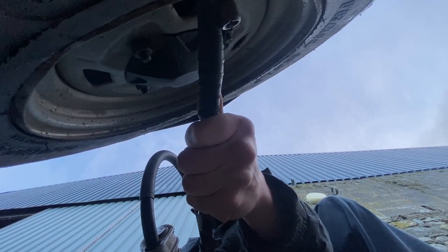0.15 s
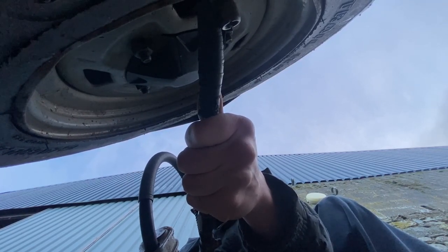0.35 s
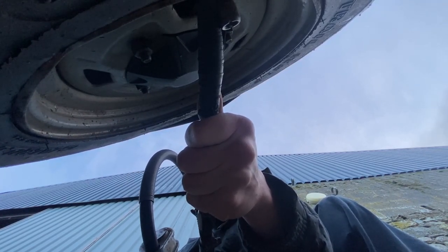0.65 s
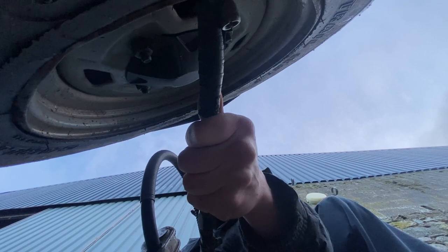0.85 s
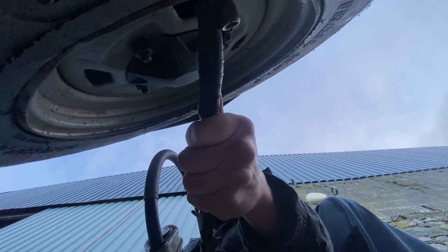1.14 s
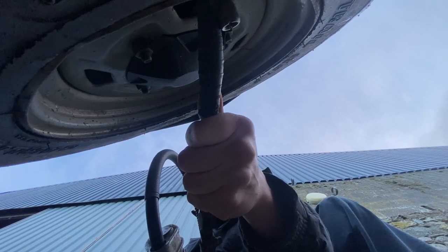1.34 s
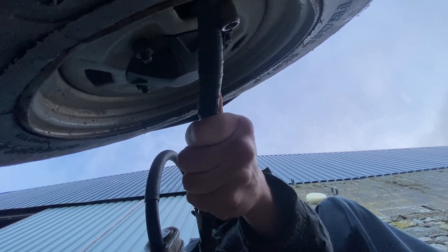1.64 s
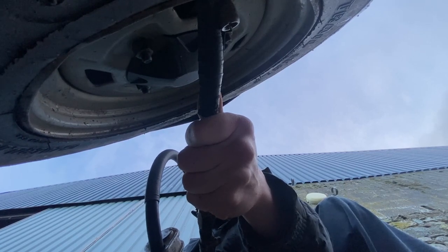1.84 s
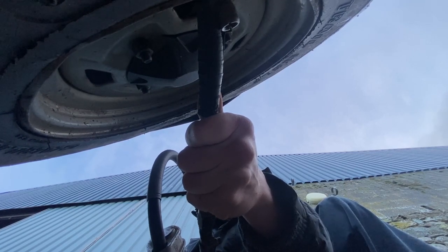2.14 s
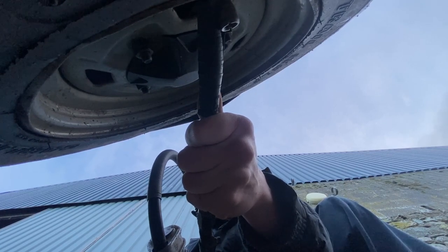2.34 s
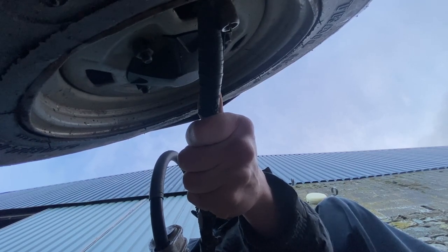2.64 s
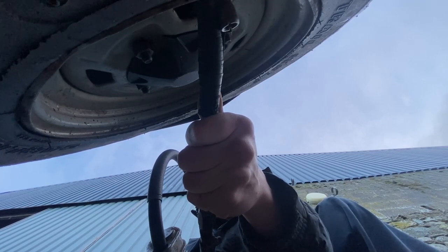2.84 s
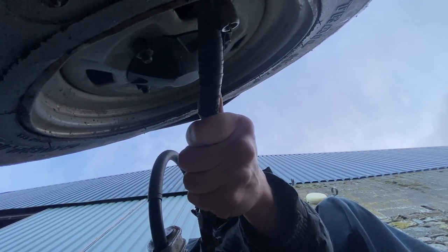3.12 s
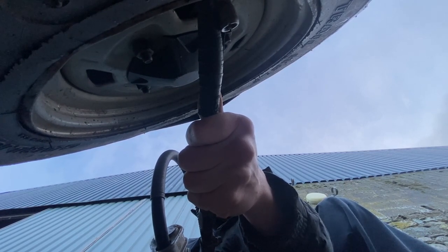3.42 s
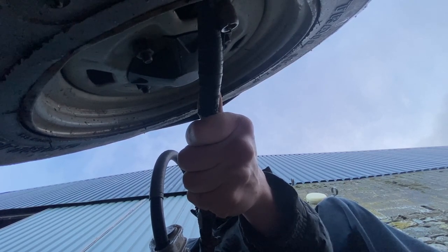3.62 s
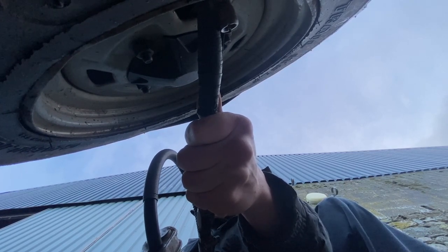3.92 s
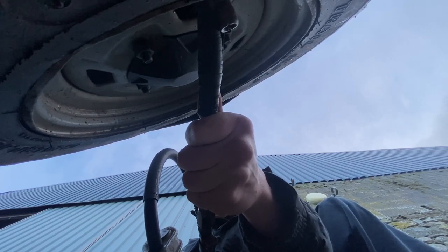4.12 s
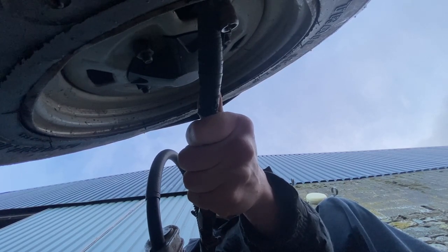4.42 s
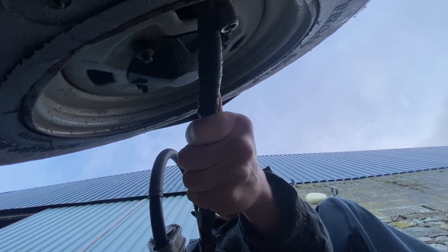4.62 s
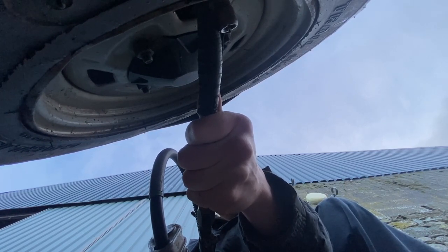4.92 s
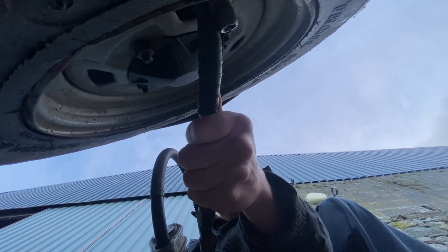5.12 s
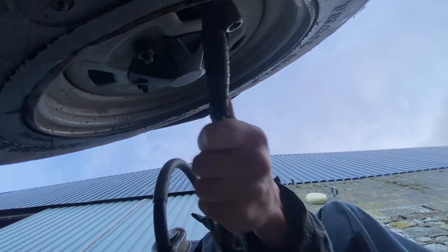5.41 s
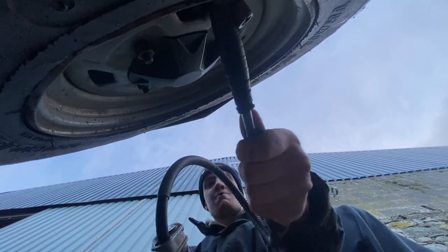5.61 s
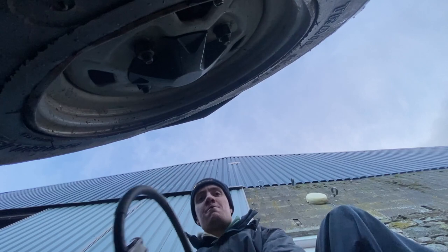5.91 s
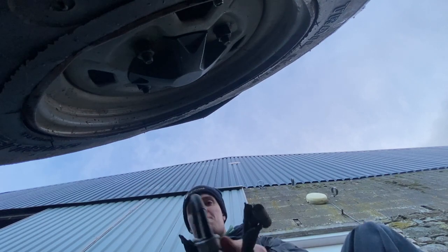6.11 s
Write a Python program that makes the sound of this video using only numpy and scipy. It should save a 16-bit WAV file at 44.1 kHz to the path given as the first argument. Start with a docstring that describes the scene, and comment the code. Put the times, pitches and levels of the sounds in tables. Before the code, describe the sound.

Outdoors, close under a wheel, a hand-held inflator fills a tyre in five short goes of hollow, slightly ringing hiss. Every trigger press and release vents a much louder spurt of air, most ending in a low pop, with small clicks around them. Air seeps faintly in the pauses. Near the end the nozzle comes off the valve with one last blast. Wind buffets the microphone over a faint yard hum.

```python
"""Under a wheel, outdoors: a hand-held inflator fills the tyre in five short goes.
Valve turbulence hisses through the air modes of hose and tyre. Each trigger press or release vents a
blast that ends in a low pop; trigger and chuck tick. Air seeps between goes, and the chuck comes off
with a last blast. Wind buffets the microphones over a faint yard hum."""
import sys
import numpy as np
from scipy import signal
from scipy.fft import rfft, irfft, next_fast_len
from scipy.io import wavfile
from scipy.ndimage import uniform_filter1d, map_coordinates

SR = 44100
rng = np.random.default_rng(int(sys.argv[2]) if len(sys.argv) > 2 else 0)


def materialize(psi):
    """Save the field psi as 16-bit PCM at rate SR to the path in sys.argv[1].

    A 1-D psi becomes a single channel; in a 2-D psi each row is a channel.
    """
    bounded = np.clip(np.atleast_2d(psi).T, -1, 1)
    quanta = np.round(bounded * 32767).astype(np.int16)
    wavfile.write(sys.argv[1], SR, quanta)


N = 276066

# Noise spectra (frequency [Hz], density [dB])
FILL_SPECTRUM = [(290, -50), (500, -16), (900, -18), (1130, -14), (1790, -21.5), (2200, -12), (3500, -16),
                 (4500, -12.5), (4800, -7.5), (6400, -9), (7700, -14.5), (10600, -18.5), (12300, -22.5),
                 (12800, -62)]
YARD_SPECTRUM = [(150, -19), (250, -9), (538, -12.5), (824, -15.5), (895, -12), (983, -18), (2170, -17.5),
                 (2750, -19), (4200, -22), (5460, -58.5), (9240, -120)]
RUMBLE_SPECTRUM = [(15, -29.5), (25, -16), (47, 2), (70, 5.5), (86, 3.5), (160, -13.5), (210, -40),
                   (350, -120)]
FLUTTER_SPECTRUM = [(65, -25.5), (110, -4), (188, -6), (348, -14), (438, -24), (504, -25.5), (900, -40),
                    (1170, -74), (1980, -120)]
JET_SPECTRUM = [(60, -39.5), (130, -15), (400, -12), (930, -15), (2100, -6), (2700, -10.5), (3290, -2.5),
                (3950, -14.5), (4910, 1.5), (5550, -4), (6100, 1.5), (7690, -11.5), (9700, -9.5),
                (16000, -26.5)]
SEEP_SPECTRUM = [(2100, -13.5), (3100, -3.5), (3800, -12), (4700, -1.5), (5110, -2), (6500, -6.5),
                 (7400, -14), (9460, -17), (11200, -21), (12300, -23), (12800, -59.5)]
LEAK_SPECTRUM = [(300, -21.5), (900, -30.5), (2200, -16), (2750, -25), (3300, -11.5), (4000, -21),
                 (4950, -4.5), (5550, -11.5), (6100, -5.5), (7700, -18.5), (9600, -11), (12300, -23),
                 (12900, -43), (14900, -43), (15300, -28)]
# Air modes of hose and tyre (frequency [Hz], relative strength [dB])
AIR_MODES = [(979, 4), (1141, 11), (1259, 4), (1356, 5), (1539, 5), (1701, 8), (1873, 10), (2002, 9),
             (2088, 8), (2196, 5), (2379, 10), (2573, 9), (2648, 5), (2950, 8), (3240, 11), (3445, 4),
             (3660, 7), (3908, 6), (4177, 10), (4349, 8), (4834, 5), (5060, 6), (5264, 8), (5426, 8),
             (5673, 8), (5878, 7), (5964, 6), (6110, 5), (6309, 8), (6729, 5)]
# Airflow, one per go (gain [dB])
GO_GAINS_DB = [-34, -34, -34, -34.5, -34]
# Gusts (start [s], hold [s], rumble [dB], flutter re rumble [dB])
WIND_GUSTS = [(.005, .035, -49, -10), (.1, .06, -44, -14), (.21, .07, -52, -12), (.57, .07, -55, -3),
              (.69, .03, -45, -8), (.745, .02, -45, -6), (.9, .05, -55, -6), (1.44, .05, -48, -5),
              (1.7, .07, -47, -10), (1.84, .07, -46, -8), (2.34, .035, -31, -16), (2.405, .03, -37, -16),
              (2.47, .11, -38, -15), (2.76, .09, -44, -14), (2.95, .09, -42, -14), (3.075, .085, -31, -14),
              (3.18, .02, -44, -4), (3.24, .1, -23, -10), (3.37, .05, -32, -8), (3.45, .09, -33, -14),
              (3.56, .05, -28, -6), (3.84, .08, -45, -11), (3.955, .09, -48, -4), (4.09, .07, -54, -3),
              (4.33, .04, -45, -4), (4.8, .1, -49, -8), (4.93, .1, -43, -8), (5.08, .12, -54, -8),
              (5.4, .17, -48, -4), (5.63, .06, -41, -12), (5.71, .13, -28, -3), (5.89, .04, -42, -6),
              (5.95, .045, -31, -14), (6.07, .08, -33, -10), (6.16, .055, -28, -7), (6.235, .05, -21, -3)]
# Trigger and chuck contacts (time [s], knock [dB], snap re knock [dB])
CONTACTS = [(0.011, -24.5, -26), (0.064, -36, 2), (0.09, -29.5, -8), (0.297, -16, -6.5), (0.447, -32, -6),
            (3.405, -33, -2), (3.512, -26, -8), (3.521, -27.5, -13.5), (3.539, -33.5, -3),
            (3.726, -30.5, -25.5), (3.975, -45, -1), (4.258, -29, -9.5), (5.563, -35, -10),
            (5.864, -45, -12), (5.884, -37, -21)]
# Trigger releases (time [s], rise [s], blast [dB], fall [dB/s], shuts after [s], pop [dB])
TRIGGER_RELEASES = [(0.316, .014, -11, 325, .089, -45), (1.576, .014, -12, 345, .16, -45),
                    (2.606, .014, -11.5, 300, .071, -23), (3.656, .008, -11.5, 380, .042, -19),
                    (5.338, .006, -11, 1200, .024, -13.5)]
# Trigger presses (valve seats [s], pop [dB], blast lead [s], blast [dB],
# bleed lead on blast [s], bleed [dB])
TRIGGER_PRESSES = [(0.6678, -17, .021, -13.5, .037, -28.5), (2.0226, -15, .021, -13.5, .03, -45),
                   (2.896, -19.5, .027, -14, .048, -27), (4.314, -16.5, .02, -17, .036, -38)]
# Chuck pulled off (time [s], pop [dB], bleed [dB], blast delay [s], blast [dB], fall [dB/s], length [s])
CHUCK_PULL = (5.699, -20, -27, .009, -12, 450, .038)
# Small second pop (time [s], level [dB])
SECOND_POP = (5.41, -30.5)
# Seeping air; last row a brief faint rustle (start [s], end [s], initial level [dB], settled level [dB])
FAINT_HISSES = [(.415, .61, -48, -53), (2.69, 2.82, -43, -56), (3.71, 4.24, -41, -58),
                (5.375, 5.695, -40, -47), (5.76, 6.26, -49, -58), (6.04, 6.07, -55, -57)]
# Trigger leak and chuck whistle envelopes (time [s], level [dB])
LEAK_LEVELS = [(1.66, -34), (2.0, -34)]
WHISTLE_LEVELS = [(3.72, -62), (4.25, -63)]
# Left-right likeness of air noise (frequency [Hz], coherence [0-1])
AIR_COHERENCE = [(150, .9), (800, 0.18), (2000, 0.47), (3500, 0.37), (4800, 0.9), (6500, 0.47),
                 (7200, 0.16), (9000, 0.43), (10000, 1), (12000, 0.4), (14000, 0.3)]
# Balance (frequency [Hz], left minus right [dB])
FILL_BALANCE = [(60, -6), (110, -0.5), (200, -3.5), (380, -1), (700, -5), (1290, 4.5), (2380, -0.5),
                (4400, -0.5), (8120, 0), (15000, 0.5)]
JET_BALANCE = [(60, -0.5), (110, -0.5), (200, -6), (380, 1), (700, 13.5), (1290, 8.5), (2380, 2),
               (4400, 1.5), (8120, -1), (15000, 1.5)]
# Phase between microphones (frequency [Hz], left lead [rad])
PHASE_LEAD = [(300, 0), (900, 2.5), (1800, 0), (2700, 1), (3300, 1.2), (4200, .3), (5500, -.6), (6600, 0),
              (7800, 3.1), (9500, 6.2), (11500, 6.5), (12700, 9.4), (14900, 9.6), (15300, 12.5)]
# Microphone port response (frequency [Hz], gain [dB])
PORT_RESPONSE = [(12600, 0), (13400, -5), (14300, -0.5), (15300, 4)]

TIME_S = np.arange(N) / SR
PRESS_RISE_S, CHUCK_RISE_S = .011, .006


def amp(db):
    return 10 ** (np.asarray(db) / 20)


def unit_rms(x):
    return x / np.sqrt(np.mean(x ** 2) + 1e-20)


def log_interp(points, hz):
    knots_hz, values = np.transpose(points)
    return np.interp(np.log(hz + 1), np.log(knots_hz + 1), values)


def colour(points):
    return lambda hz: amp(log_interp(points, hz))


def gate(start_s, end_s, fade_s):
    return np.clip(1 - np.maximum(start_s - TIME_S, TIME_S - end_s) / fade_s, 0, 1)


def envelope(points, fade_s):
    times_s, levels_db = np.transpose(points)
    return gate(times_s[0], times_s[-1], fade_s) * amp(np.interp(TIME_S, times_s, levels_db))


def wobble(rate_hz):
    """Smooth random curve."""
    return map_coordinates(rng.standard_normal(int(N * rate_hz / SR) + 4), [TIME_S * rate_hz])


def filtered(x, response):
    size = next_fast_len(N + 8192)
    return irfft(rfft(x, size) * response(np.fft.rfftfreq(size, 1 / SR)), size)[..., :N]


def tails(t60_s, count):
    """Unit-energy decaying noise: responses of a hollow with many modes."""
    t = np.arange(SR // 4) / SR
    decay = rng.standard_normal((count, len(t))) * amp(-60 * t / t60_s)
    return decay / np.linalg.norm(decay, axis=1, keepdims=True)


def rush(gain, patchy_db, balance=FILL_BALANCE, coherence=AIR_COHERENCE):
    """Stereo noise with random time-frequency patches; mid rms 1."""
    def mid_side_gains(hz):
        angle = np.arccos(np.clip(log_interp(coherence, hz), -1, 1)) / 2
        return gain(hz) * [np.cos(angle), np.sin(angle)]

    def left_right_gains(hz):
        left = amp(log_interp(balance, hz) / 2) * np.exp(.5j * log_interp(PHASE_LEAD, hz))
        return np.array([left, 1 / left])

    bins = signal.stft(rng.standard_normal((2, N)), nperseg=512)[2]
    patches = uniform_filter1d(rng.standard_normal(bins.shape[1:]), 6, axis=0)
    patches = unit_rms(uniform_filter1d(patches, 10, axis=1))
    pair = signal.istft(bins * amp(patchy_db * patches), nperseg=512)[1][:, :N]
    mid, side = filtered(pair, mid_side_gains)
    out = filtered(np.array([mid + side, mid - side]), left_right_gains)
    return out / np.sqrt(np.mean(out.mean(axis=0) ** 2))


def flow_gains(choke_db=7.5, choke_s=.035, build_s=.05):
    """Flow chokes after a press, builds up, ends at release. The first go is already under way."""
    starts_s = [-1] + [press[0] for press in TRIGGER_PRESSES]
    goes = []
    for start_s, (end_s, *_), db in zip(starts_s, TRIGGER_RELEASES, GO_GAINS_DB):
        t = TIME_S - start_s
        choke = np.where(t < choke_s, .5 + .5 * t / choke_s, np.exp(-np.abs(t - choke_s) / build_s))
        goes.append(gate(start_s, end_s, fade_s=.017) * amp(db - choke_db * np.clip(choke, 0, 1)))
    return goes


def tyre_fill():
    """Valve turbulence excites air modes; the tyre's hollow adds a fine comb; the hose flutters."""
    def hiss_gain(hz):
        width_hz = 16 + .0049 * mode_hz  # higher modes lose more to the walls
        detuning = 2 * (hz[:, None] - mode_hz) / width_hz
        mode_power = np.sum(amp(2 * mode_db) / (1 + detuning ** 2), axis=1)
        return colour(FILL_SPECTRUM)(hz) * np.sqrt(1 + 3.06 * mode_power)

    mode_hz, mode_db = np.transpose(AIR_MODES)
    hiss = rush(hiss_gain, patchy_db=1.2)
    goes, air = flow_gains(), 0
    for go, hollow in zip(goes, tails(t60_s=.18, count=len(goes))):  # new comb per go: the tyre swells
        ringing = signal.fftconvolve(hiss, hollow[None], axes=1)[:, :N]
        air = air + go * unit_rms(hiss + .4 * ringing)
    hose = rush(colour(FLUTTER_SPECTRUM), patchy_db=2.5, coherence=[(130, .8), (600, .4)])
    return air * amp(1.5 + .7 * wobble(12)) + amp(-21) * sum(goes) * hose


def yard_hum(level_db=-56):
    """Faint, wavering background noise."""
    gain = amp(level_db + 1.5 * wobble(15))
    return gain * rush(colour(YARD_SPECTRUM), patchy_db=.5, coherence=[(300, .7), (3000, .4)])


def wind(rise_db_s=1300, fall_db_s=500, calm_rumble_db=-63, calm_flutter_db=-72):
    """Gusts hit the microphone ports abruptly and fade more slowly, over a calm breeze."""
    def buffet(spectrum, coherence, lump_db, patchy_db, steady_s):
        lumps = amp(lump_db * (shared + .47 * np.array([wobble(30), wobble(30)])))
        noise = rush(colour(spectrum), patchy_db, balance=[(1, 0)], coherence=coherence)
        swell = np.abs(uniform_filter1d(noise.mean(axis=0) ** 2, round(steady_s * SR)))
        return unit_rms(lumps * noise / (swell + .05) ** .3)  # partly evens out chance swells

    rumble_power = amp(2 * (calm_rumble_db + 3.5 * wobble(6)))
    flutter_power = amp(2 * calm_flutter_db)
    for start_s, hold_s, db, flutter_db in WIND_GUSTS:
        before_s = np.clip(start_s - TIME_S, 0, 1)
        after_s = np.clip(TIME_S - start_s - hold_s, 0, 1)
        power = amp(2 * (db - rise_db_s * before_s - fall_db_s * after_s))
        rumble_power = rumble_power + power
        flutter_power = flutter_power + power * amp(2 * flutter_db)
    shared = wobble(25)
    rumble = buffet(RUMBLE_SPECTRUM, [(40, .93), (130, .4)], lump_db=1.8, patchy_db=2.2, steady_s=.04)
    flutter = buffet(FLUTTER_SPECTRUM, [(130, .7), (600, .35)], lump_db=2.6, patchy_db=3.4, steady_s=.03)
    return np.sqrt(rumble_power) * rumble + np.sqrt(flutter_power) * flutter


def ticks(latch_delay_s=.014, latch_db=-27.5, latch_snap_db=12.5):
    """Tiny contacts: dull body knock plus bright snap. One follows each press 14 ms after the valve seats, as
    the trigger reaches its stop."""
    def resonate(x, centre_hz, width_hz):
        bandpass = lambda hz: 1j * hz * width_hz / (centre_hz ** 2 - hz ** 2 + 1j * hz * width_hz)
        return filtered(x[:, :N], lambda hz: bandpass(hz) ** 2)

    dull, bright = np.zeros((2, 2, N + SR))
    t = np.arange(SR // 50) / SR
    knock = amp(-60 * t / .007) * np.minimum(t / .0006, 1)
    snap = amp(-60 * t / .014) * np.minimum(t / .0011, 1)
    latches = [(press[0] + latch_delay_s, latch_db, latch_snap_db) for press in TRIGGER_PRESSES]
    for time_s, db, snap_db in CONTACTS + latches:
        shared = rng.standard_normal((2, 1, len(t)))
        knock_noise, snap_noise = shared + .48 * rng.standard_normal((2, 2, len(t)))
        span = slice(round(time_s * SR), round(time_s * SR) + len(t))
        dull[:, span] += amp(db + 13.5) * knock * knock_noise  # added dB offset resonator loss
        bright[:, span] += amp(db + snap_db + 2) * snap * snap_noise
    return resonate(dull, 1480, 3000) + resonate(bright, 4900, 7100)


def wheel_arch(x, wet_db=-12.5, highpass_hz=900):
    """Sheet metal and ground give the treble a short tail."""
    wet = signal.fftconvolve(x, tails(t60_s=.079, count=2), axes=1)[:, :N]
    return x + amp(wet_db) * filtered(wet, lambda hz: 1j * hz / (highpass_hz + 1j * hz))


def vent_openings():
    """Air escapes (start [s], rise [s], peak [dB], hold [s], fall [dB/s], shuts after [s])."""
    for start_s, rise_s, db, fall_db_s, shut_s, _ in TRIGGER_RELEASES:
        yield start_s, rise_s, db, .013, fall_db_s, shut_s
    for seat_s, _, lead_s, db, bleed_s, bleed_db in TRIGGER_PRESSES:
        yield seat_s - lead_s, PRESS_RISE_S, db, .002, 450, lead_s
        yield seat_s - lead_s - bleed_s, PRESS_RISE_S, bleed_db, 0, 90, bleed_s + PRESS_RISE_S
    pull_s, _, bleed_db, delay_s, db, fall_db_s, length_s = CHUCK_PULL
    yield pull_s, CHUCK_RISE_S / 2, bleed_db, 0, 0, delay_s + CHUCK_RISE_S
    yield pull_s + delay_s, CHUCK_RISE_S, db, 0, fall_db_s, length_s


def blasts(shut_db_s=3500, freed_lowpass_hz=10500):
    """A flapping jet swells as the valve opens, sinks with the pressure, stops as it shuts."""
    power = np.zeros(N)
    for start_s, rise_s, peak_db, hold_s, fall_db_s, shut_s in vent_openings():
        t = TIME_S - start_s
        level_db = peak_db - 24 * np.clip(1 - t / rise_s, 0, 1)
        level_db -= fall_db_s * np.clip(t - rise_s - hold_s, 0, shut_s)
        level_db -= shut_db_s * np.clip(t - shut_s, 0, 1)
        power += (t > 0) * amp(2 * level_db)
    sputter = amp(.67 * wobble(400))
    noise = rush(colour(JET_SPECTRUM), patchy_db=2.37, balance=JET_BALANCE)
    jet = np.sqrt(power) * unit_rms(sputter * noise)
    freed = TIME_S > CHUCK_PULL[0]  # the freed chuck points away: duller
    return jet * ~freed + filtered(jet * freed, lambda hz: 1 / np.sqrt(1 + (hz / freed_lowpass_hz) ** 6))


def pops(attack_s=.0006, decay_s=.009):
    """Short low thumps that fall quickly in pitch."""
    t = np.arange(SR // 20) / SR
    pitch_hz = 150 + 400 * np.exp(-t / .0018)
    shape = (1 - np.exp(-t / attack_s)) * np.exp(-(t / decay_s) ** 2)
    thump = shape * np.sin(2 * np.pi * np.cumsum(pitch_hz) / SR)
    events = [press[:2] for press in TRIGGER_PRESSES]
    events += [(start_s + shut_s, db) for start_s, *_, shut_s, db in TRIGGER_RELEASES]
    events += [(CHUCK_PULL[0] + CHUCK_RISE_S, CHUCK_PULL[1]), SECOND_POP]
    out = np.zeros(N + SR)
    for time_s, db in events:
        out[round(time_s * SR):][:len(t)] += amp(db) * thump
    return out[:N] * amp([[-.4], [.4]])


def seep_and_rustle(settle_s=.045):
    """Air seeps at the chuck as the hose empties; near the end, a brief faint rustle of hiss."""
    gain = np.zeros(N)
    for start_s, end_s, initial_db, settled_db in FAINT_HISSES:
        decay = np.exp(-np.maximum(TIME_S - start_s, 0) / settle_s)
        gain += gate(start_s, end_s, fade_s=.03) * amp(settled_db + (initial_db - settled_db) * decay)
    return gain * rush(colour(SEEP_SPECTRUM), patchy_db=.5)


def trigger_leak():
    """The half-held trigger bleeds air."""
    noise = rush(colour(LEAK_SPECTRUM), patchy_db=.3, balance=JET_BALANCE)
    return envelope(LEAK_LEVELS, fade_s=.031) * noise


def chuck_whistle(centre_hz=2870, half_width_hz=130):
    """Faint narrow band of air noise at the chuck."""
    band = rush(lambda hz: 1 / (1 + ((hz - centre_hz) / half_width_hz) ** 2), patchy_db=2)
    return envelope(WHISTLE_LEVELS, fade_s=.017) * band


def scene():
    out = tyre_fill() + yard_hum() + wind()
    out += wheel_arch(ticks() + blasts() + trigger_leak())
    return out + pops() + seep_and_rustle() + chuck_whistle()


def record(dry):
    """Microphone ports colour the high treble; peaks round off; the band is limited."""
    ceiling, top_hz, taper_hz = .95, 16150, 300
    heard = filtered(dry, colour(PORT_RESPONSE))
    heard = heard / (1 + np.abs(heard / ceiling) ** 6) ** (1 / 6)
    return filtered(heard, lambda hz: np.sin(np.pi / 2 * np.clip((top_hz - hz) / taper_hz, 0, 1)) ** 2)


dry = scene()
out = record(dry)
materialize(out)
```